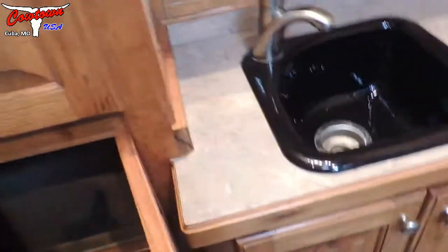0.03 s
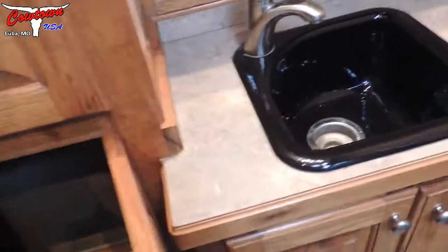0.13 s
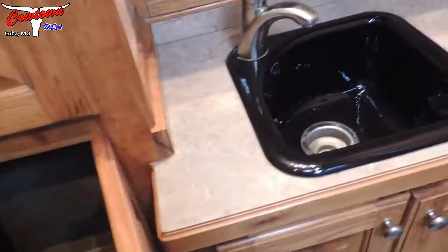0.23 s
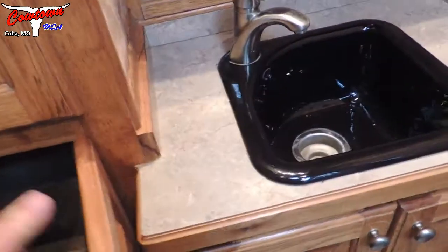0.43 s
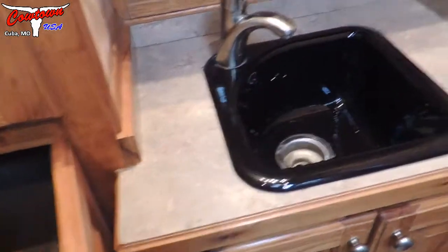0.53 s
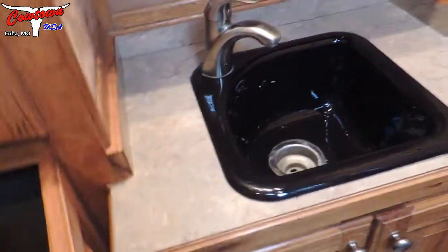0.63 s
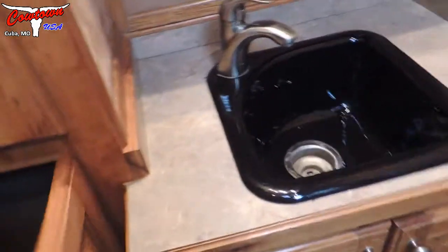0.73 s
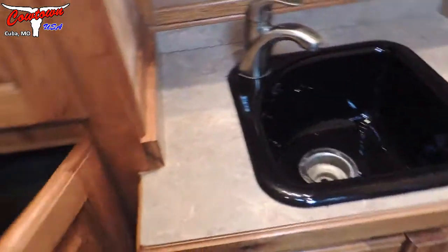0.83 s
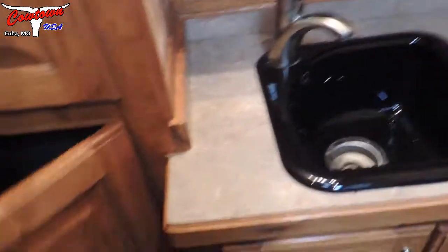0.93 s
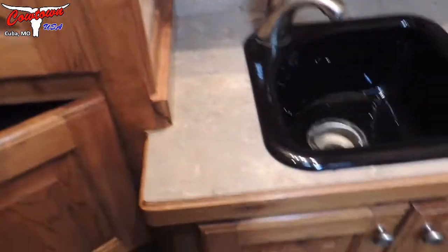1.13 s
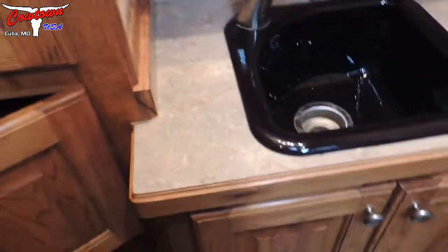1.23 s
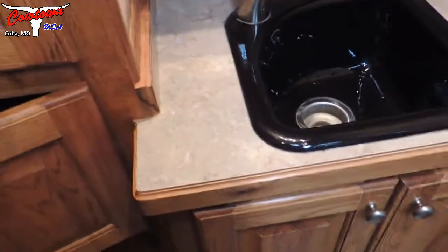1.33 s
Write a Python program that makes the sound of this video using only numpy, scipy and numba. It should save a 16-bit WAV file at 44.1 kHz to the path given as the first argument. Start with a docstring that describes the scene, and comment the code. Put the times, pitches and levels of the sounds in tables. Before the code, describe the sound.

A wooden cabinet door gives a light bump, then a sharp metal catch snap and a loud overloaded clunk; background rumble and hiss dip and swell back, with a faint low nudge and thin hinge tick.

```python
"""A wooden cabinet door is worked by hand in a tiny trailer bathroom, over room rumble and hiss whose
level rises and falls. A light bump comes first, then the snap of the metal catch, then a loud clunk:
each knock is decaying noise plus damped panel and cupboard modes, each snap is bright decaying noise.
The close recorder overloads and its gain control ducks the background noise, which then swells back
as the door swings: a soft low nudge, then one thin tick of the hinge."""
import sys
import numpy as np
from scipy import signal
from scipy.fft import rfft, irfft
from scipy.io import wavfile
from scipy.ndimage import minimum_filter1d
from numba import njit

SR = 44100
rng = np.random.default_rng(int(sys.argv[2]) if len(sys.argv) > 2 else 0)


def generate_wav(signal):
    """Clip the signal to [-1, 1] and save it as 16-bit WAV at the path in sys.argv[1]."""
    frames = np.transpose(np.atleast_2d(signal))
    scaled = np.clip(frames, -1, 1) * 32767
    pcm = np.round(scaled).astype(np.int16)
    wavfile.write(sys.argv[1], SR, pcm)


N = 61739

# Blows of wood on wood:
# (time [s], clatter level [dB], panel level [dB], cupboard level [dB], clatter corner frequency [Hz])
KNOCKS = [(0.036, -27.5, -30.5, -21.5, 5260), (.18, -50, -29.5, -75.5, 1218),
          (0.1941, -18.5, -23, -26, 3400), (.202, -9.5, -12, -19.5, 1750),
          (0.2258, 1.5, -10.5, -11.5, 6660), (.23, -7, 6, -15, 2023), (.24, -1, 1, -6.5, 2870),
          (0.2608, -19, -4.5, -11, 1200)]
# First, quickly damped flex of the panel: (frequency [Hz], relative level [dB], T60 [s])
FLEX_MODES = [(389, 4, 0.045)]
# Ringing modes of the door panel: (frequency [Hz], relative level [dB], T60 [s])
PANEL_MODES = [(203, -21, .3), (333.4, -6, 0.17), (356.6, -5, .16), (399.4, 2.5, 0.14), (446.2, -3.5, 0.29),
               (492.7, -8.5, 0.15), (618.3, -0.5, 0.099), (709.3, -17, 0.22), (887, -16, .19),
               (1118, -16.5, .17), (1307, -11, 0.12), (1388, -29.5, 0.18), (1714, -21, 0.13),
               (2149, -19, .13)]
# Modes of the air and walls of the cupboard: (frequency [Hz], relative level [dB], T60 [s])
CUPBOARD_MODES = [(49, -1, .4), (75.26, 4, .4), (125.4, -3.5, 0.22), (149, -6.5, 0.23), (240.3, -6.5, .3)]
# Spectrum of the dense ring of wood and room: (frequency [Hz], relative density [dB per Hz])
WOOD_COLOUR = [(40, -8), (140, 2), (260, -2), (400, 1.5), (800, -4.5), (1600, -8.5), (3000, -10),
               (6000, -12), (13000, -26.5)]
# Decay of that dense ring: (frequency [Hz], T60 [s])
WOOD_T60 = [(60, 0.35), (300, 0.26), (1000, 0.22), (3000, 0.15), (12000, 0.19)]
# Snaps of the metal catch: (time [s], level [dB])
SNAPS = [(0.187, -32), (0.1906, -19), (0.1935, -12.5), (.2135, -1), (0.2173, -5.5), (0.2186, -2.5)]
# Spectrum of the catch: (frequency [Hz], relative density [dB per Hz])
METAL_COLOUR = [(200, 1.5), (1000, -9.5), (2000, -6), (3300, -5.5), (5500, 1.5), (8000, -4), (12500, -6),
                (15000, -6.5)]
# Spectrum of the hinge tick: (frequency [Hz], relative density [dB per Hz])
TICK_HZ = 8200
TICK_COLOUR = [(TICK_HZ / 2, -25), (TICK_HZ * .75, 0), (TICK_HZ * 2, -8)]
# Spectrum of the room noise: (frequency [Hz], relative density [dB per Hz])
ROOM_COLOUR = [(15, -34), (25, 5), (76, 1), (131, -7), (162, -17.5), (222, -5.5), (305, -14.5), (490, -6.5),
               (589, -14), (997, -17.5), (1400, -21.5), (2440, -20.5), (3620, -25.5), (5660, -25.5),
               (13500, -32.5)]
# Recorder's changing level of the background noise:
# (time [s], change of the middle [dB], change of the treble [dB])
NOISE_LEVELS = [(0, 4.5, 7.5), (0.168, 6.5, 3.5), (.45, -3.5, -2.5), (.65, -7.5, -5.5), (0.701, 4, 0),
                (.95, 2.5, -2.5), (1.06, -2, 3.5), (1.23, 4.5, 2), (1.4, 1, 1.5)]
# Power share common to both microphone ports: (frequency [Hz], share [0-1, negatives read as 0])
LIKENESS = [(100, .98), (400, 0.98), (1000, 0.8), (4000, 0.5451), (12000, -0.55)]
# Balance of the ports for noise: (frequency [Hz], left minus right [dB])
BALANCE = [(300, 2), (2000, 2), (5000, 0.5), (9000, 0), (13000, 9)]

WOOD_RISE_S, PANEL_RISE_S, BOOM_RISE_S = 0.00051, .004, 0.0042
CRACK_DB, CRACK_T60_S = 1, 0.042  # splintery start of the clatter
SNAP_RISE_S, SNAP_T60_S = 0.00023, 0.029
SNAP_ROOM_DB, SNAP_ROOM_RISE_S, SNAP_ROOM_T60_S = -12.5, 0.0089, 0.2
NUDGE_S, NUDGE_DB = .664, -28.5
TICK_S, TICK_DB, TICK_RISE_S, TICK_T60_S = .6935, -31, 0.00016, 0.0041
ROOM_DB, ROOM_WAVER_DB = -40, 2.5  # level before its changes; standard deviation of the waver
MIDDLE_HZ, TREBLE_HZ = 1900, 6500
RIGHT_LAG_S = .00011
AGC_THRESHOLD_DB, AGC_ATTACK_S, AGC_HOLD_S, AGC_RELEASE_DB_PER_S = -1.5, 0.053, 0.2, 11.5
CLIP_DB, TOP_HZ = -.6, 14000


def undb(db):
    """Amplitude is ten to the power of level over twenty."""
    return 10 ** (np.asarray(db) / 20)


def at(table, hz):
    """Linear interpolation of a table over the logarithm of frequency."""
    table_hz, values = np.array(table, float).T
    return np.interp(np.log(np.maximum(hz, 1)), np.log(table_hz), values)


def since(start):
    """Elapsed time in seconds after an onset, zero before it."""
    return np.maximum(np.arange(N) / SR - start, 0)


def envelope(start, rise, t60):
    """Exponential damping: a quick rise, then a decay factor that falls 60 dB in each t60."""
    t = since(start)
    return (1 - np.exp(-t / rise)) * np.exp(-np.log(1000) * t / t60)


def bands(colour):
    """Partial coherence: coloured stereo noise, rms near 1 before balance, as (Hz, octave band) pairs."""
    f = np.arange(N // 2 + 1) * SR / N
    shared, left, right = rfft(rng.standard_normal((3, N)))
    likeness = np.clip(at(LIKENESS, f), 0, 1)
    low_cut = f ** 2 / (f ** 2 + 20 ** 2)
    gain = undb(at(colour, f)) * low_cut * (f < TOP_HZ + 1000)
    gain_rms = np.sqrt(np.mean(gain ** 2))
    stereo = np.sqrt(likeness) * shared + np.sqrt(1 - likeness) * np.array([left, right])
    noise = stereo * gain / gain_rms
    noise = noise * undb(np.outer([.5, -.5], at(BALANCE, f)))
    centres = 30 * 2. ** np.arange(10)
    result = []
    for hz in centres:
        # Neighbouring bands crossfade, so that together they restore the whole noise
        weight = at(list(zip(centres, centres == hz)), f)
        result.append((hz, irfft(noise * weight, N)))
    return result


def ring(modes, start, rise):
    """Modal superposition: one blow excites a sum of damped sinusoids."""
    total = np.zeros(N)
    for hz, db, t60 in modes:
        oscillation = np.sin(2 * np.pi * hz * since(start))
        total += undb(db) * envelope(start, rise, t60) * oscillation
    return total


def door():
    """Impact excitation: each knock yields dense wood clatter, panel flex and ring, and cupboard boom."""
    out = np.zeros((2, N))
    for start, clatter_db, panel_db, boom_db, corner_hz in KNOCKS:
        crack = undb(CRACK_DB) * envelope(start, WOOD_RISE_S, CRACK_T60_S)
        for hz, band in bands(WOOD_COLOUR):
            shape = crack + envelope(start, WOOD_RISE_S, at(WOOD_T60, hz))
            softening = np.hypot(1, hz / corner_hz)
            out += undb(clatter_db) * band * shape / softening
        flex = ring(FLEX_MODES, start, WOOD_RISE_S)
        panel = ring(PANEL_MODES, start, PANEL_RISE_S)
        out += undb(panel_db) * (flex + panel)
        out += undb(boom_db) * ring(CUPBOARD_MODES, start, BOOM_RISE_S)
    return out


def catch():
    """Impulsive radiation with reverberation: bright metal snaps, each with a tail from the close walls."""
    out = np.zeros((2, N))
    for start, db in SNAPS:
        direct = envelope(start, SNAP_RISE_S, SNAP_T60_S)
        tail = undb(SNAP_ROOM_DB) * envelope(start, SNAP_ROOM_RISE_S, SNAP_ROOM_T60_S)
        metal = sum(band for hz, band in bands(METAL_COLOUR))
        out += undb(db) * (direct + tail) * metal
    return out


def swing():
    """Weak excitation: a nudge rings the two lowest cupboard modes; the hinge tick is a brief noise burst."""
    thin = sum(band for hz, band in bands(TICK_COLOUR))
    tick = envelope(TICK_S, TICK_RISE_S, TICK_T60_S) * thin
    nudge = ring(CUPBOARD_MODES[:2], NUDGE_S, BOOM_RISE_S)
    return undb(TICK_DB) * tick + undb(NUDGE_DB) * nudge


def room():
    """Modulated noise: the recorder's level shifts middle and treble separately, and every band wavers."""
    t, knots = np.arange(N) / SR, np.linspace(0, N / SR, 20)
    times, middle, treble = np.array(NOISE_LEVELS).T
    out = np.zeros((2, N))
    for hz, band in bands(ROOM_COLOUR):
        middle_share = at([(MIDDLE_HZ / 10, 0), (MIDDLE_HZ, 1), (TREBLE_HZ, 0)], hz)
        treble_share = at([(MIDDLE_HZ, 0), (TREBLE_HZ, 1)], hz)
        level_change = np.interp(t, times, middle * middle_share + treble * treble_share)
        waver = ROOM_WAVER_DB * np.interp(t, knots, rng.standard_normal(len(knots)))
        out += band * undb(ROOM_DB + level_change + waver)
    return out


def scene():
    """Superposition and path delay: from a little to the left, sound reaches the right port later."""
    left, right = door() + catch() + swing() + room()
    samples = np.arange(N)
    lag = np.round(RIGHT_LAG_S * SR)
    return np.array([left, np.interp(samples - lag, samples, right)])


@njit
def duck(over, attack, release, hold):
    """Feed-forward compression: the cut in dB approaches the excess, holds, then falls at a steady rate."""
    out, cut, wait = np.zeros(len(over)), 0., 0.
    for i in range(len(over)):
        if over[i] > cut:
            cut, wait = cut + (over[i] - cut) * attack, hold
        elif wait > 0:
            wait -= 1
        else:
            cut = max(cut - release, 0.)
        out[i] = cut
    return out


def record(dry):
    """Nonlinear recording: gain control too slow for the clunk, hard clipping, then a steep top cut."""
    loudest = np.abs(dry).max(axis=0)
    peak = -minimum_filter1d(-loudest, size=200)  # running maximum over 200 samples
    over = 20 * np.log10(peak + 1e-9) - AGC_THRESHOLD_DB
    cut = duck(over, 1 / (AGC_ATTACK_S * SR), AGC_RELEASE_DB_PER_S / SR, float(AGC_HOLD_S * SR))
    clipped = np.clip(dry * undb(-cut), -undb(CLIP_DB), undb(CLIP_DB))
    top_cut = signal.ellip(10, .1, 60, TOP_HZ, fs=SR, output="sos")
    return signal.sosfilt(top_cut, clipped)


dry = scene()
out = record(dry)
generate_wav(out)
```